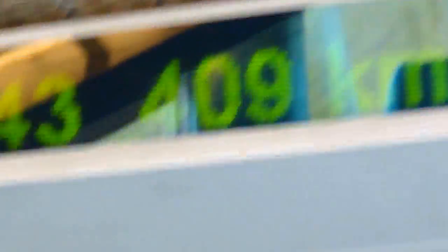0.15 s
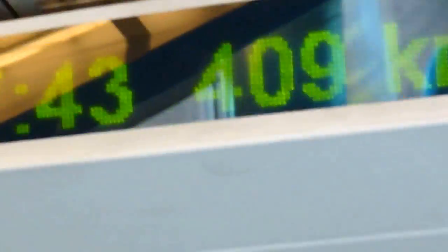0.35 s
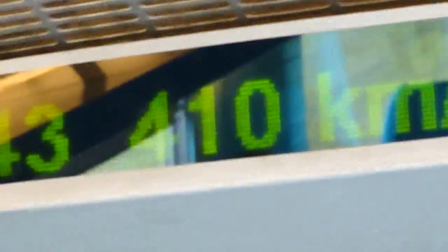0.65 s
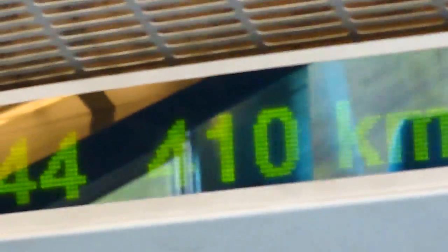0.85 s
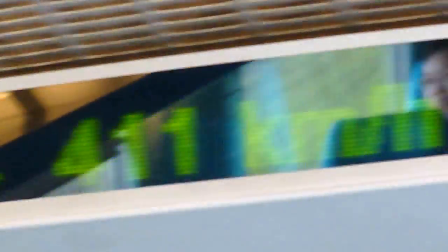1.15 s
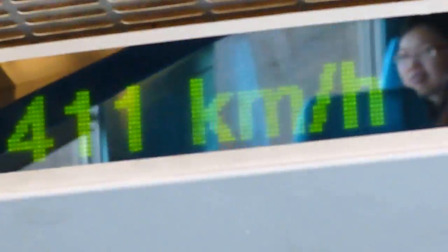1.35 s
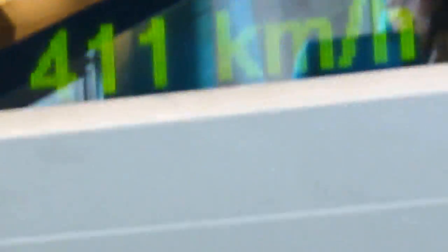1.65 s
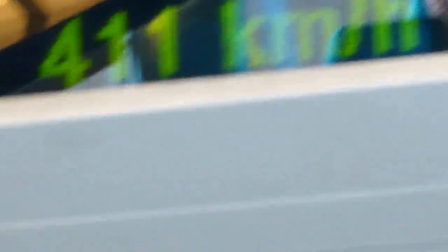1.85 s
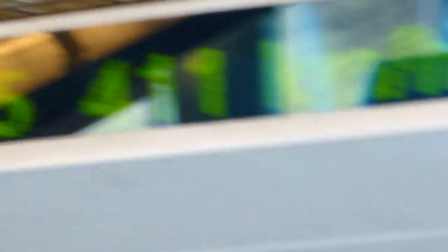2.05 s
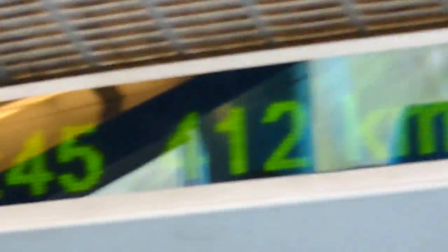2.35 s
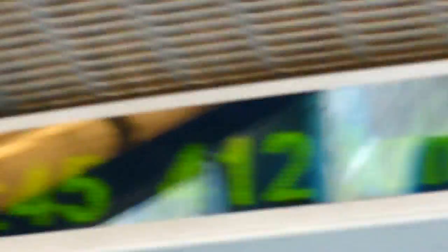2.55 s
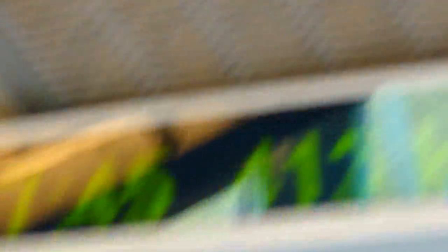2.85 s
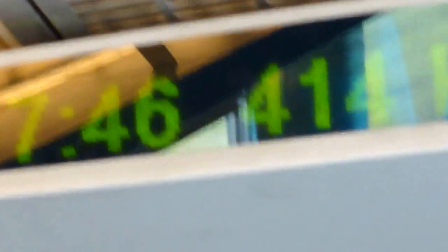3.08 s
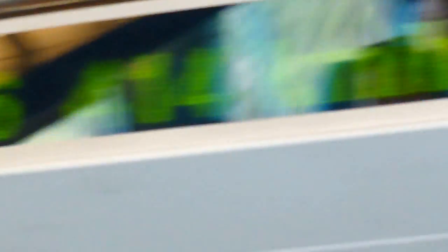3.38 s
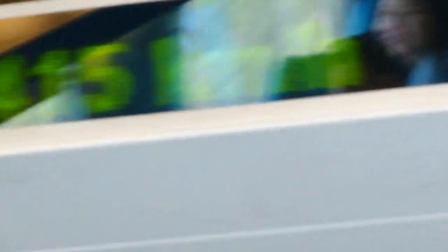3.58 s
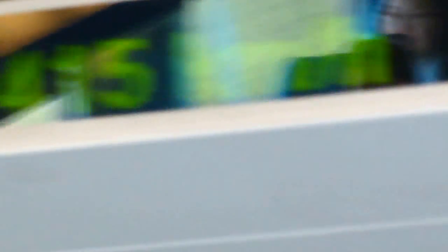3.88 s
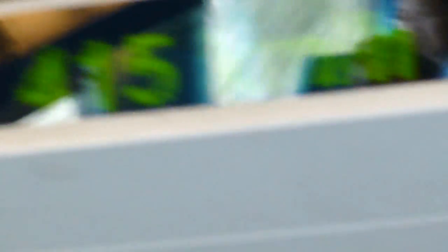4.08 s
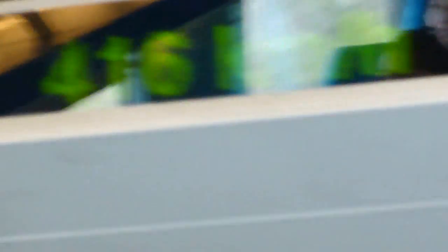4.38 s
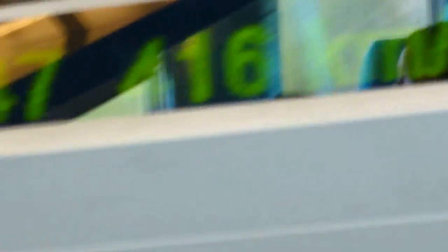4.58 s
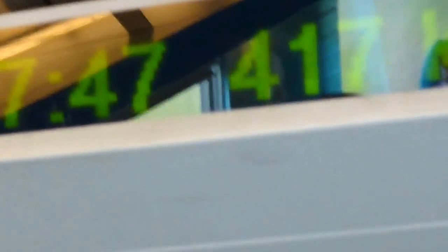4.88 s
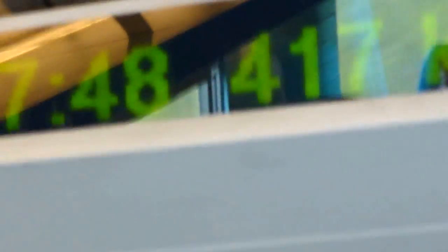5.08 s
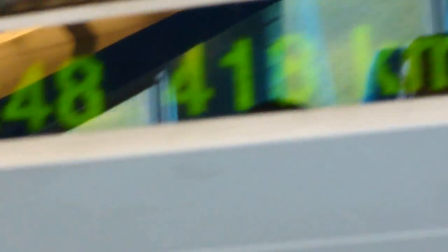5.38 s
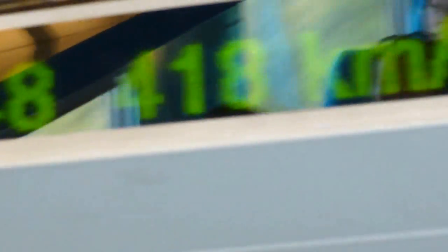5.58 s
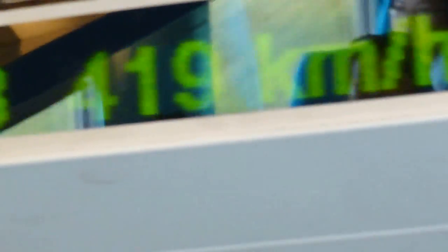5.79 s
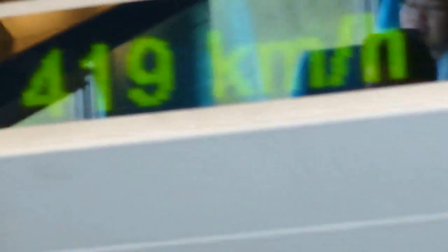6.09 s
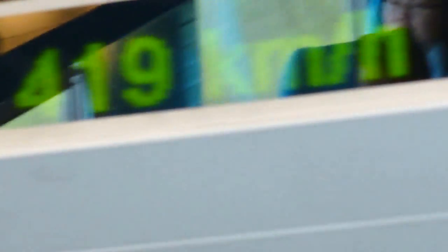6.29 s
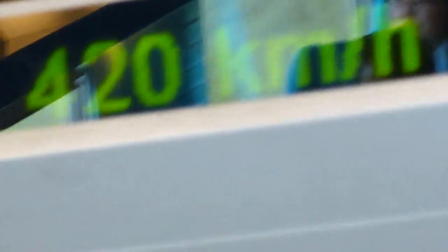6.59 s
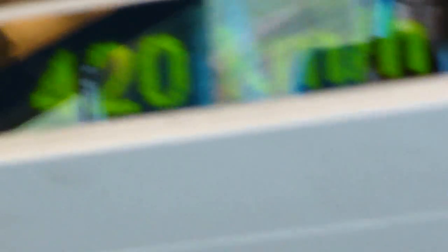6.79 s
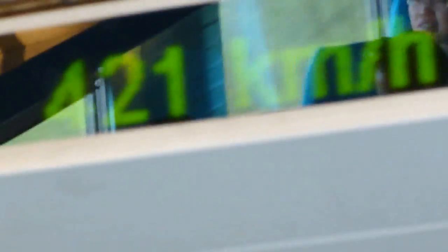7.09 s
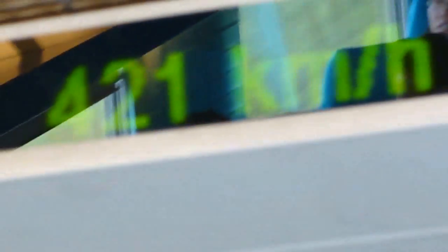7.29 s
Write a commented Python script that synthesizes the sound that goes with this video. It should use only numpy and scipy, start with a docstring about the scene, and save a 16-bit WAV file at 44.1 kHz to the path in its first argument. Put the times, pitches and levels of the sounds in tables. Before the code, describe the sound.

A passenger cabin at high speed: full, low-weighted air noise through the body shell, steady with small uneven gusts. Over it a narrow airy whistle flutters in strength but stays on nearly the same note. Quiet motor tones hum underneath, rising very slightly, with a thin higher tone coming and going. Faint cabin trim rustles and clicks are scattered throughout. Heard from a single microphone inside, already running at the start and unchanged at the end.

```python
"""Inside the cabin of a magnetically levitated train that slowly gains speed.
Air rushes along the body: turbulent noise, coloured by the shell and unsteady in level.
A gap whistles on one wavering pitch: noise in a narrow resonance that saturates.
The track's repeating motor segments hum on multiples of their passing rate, creeping up with speed.
Trim rustles and ticks faintly: clumped grains and dying bursts of resonant noise."""
import sys
import numpy as np
from scipy import signal
from scipy.fft import rfft, irfft
from scipy.io import wavfile
from scipy.ndimage import uniform_filter1d

SR = 44100
rng = np.random.default_rng(int(sys.argv[2]) if len(sys.argv) > 2 else 0)


def dump(signal):
    """Clip the signal to [-1, 1] and save it as 16-bit WAV at the path in sys.argv[1]."""
    limited = np.clip(np.atleast_2d(signal).T, -1, 1)
    pcm = np.round(limited * 32767).astype(np.int16)
    wavfile.write(sys.argv[1], SR, pcm)


N = 328104  # length in samples


def gain_of(db):
    """Level definition: 20 dB is a tenfold amplitude."""
    return 10 ** (np.asarray(db) / 20)


def evened(x):
    """Normalisation: scales a signal to rms 1."""
    return x / np.sqrt(np.mean(x ** 2) + 1e-20)


def smooth_noise(count, size):
    """Moving average: smoothing white noise over size values leaves slow variation, here of rms 1."""
    return evened(uniform_filter1d(rng.standard_normal(count), size=size))


def columns(rows, t):
    """Linear interpolation: joins the rows of a curve table at the times t."""
    s, *values = np.transpose(rows)
    return [np.interp(t, s, v) for v in values]


def over_log_frequency(rows, hz):
    """Logarithmic frequency scale: joins the rows of a spectrum table at the frequencies hz."""
    f, values = np.transpose(rows)
    return np.interp(np.log(hz + 1), np.log(f + 1), values)


def resonance_curve(hz, centre, width):
    """Lorentzian resonance: 1 at the centre, one half at half a width to either side."""
    return 1 / (1 + (2 * (hz - centre) / width) ** 2)


def add(mix, s, sound):
    """Superposition: lays a sound into the mix at s seconds."""
    part = mix[round(s * SR):][:len(sound)]
    part += sound[:len(part)]


def resonate(x, hz, width):
    """Heterodyne: shifts the curve hz to zero, smooths, shifts back, a resonance of gain 1."""
    turn = np.exp(2j * np.pi * np.cumsum(hz * np.ones(len(x))) / SR)
    r = np.exp(-np.pi * width / SR)
    smoothed = signal.lfilter([1 - r], [1, -r], x / turn)
    return 2 * (turn * smoothed).real


def drift(t, per_s):
    """Random-phase superposition: sines up to per_s turns a second, slow ones stronger, to rms 1."""
    rates = np.geomspace(per_s / 10, per_s, num=20)
    phases = rng.random(len(rates))
    return evened(sum(np.sin(2 * np.pi * (f * t + p)) / np.sqrt(f) for f, p in zip(rates, phases)))


# spectrum of the air rush through the body shell: f/Hz, relative level per Hz/dB
RUSH_SPECTRUM = [(20, -43), (50, -12.5), (80, -5.5), (150, -6), (270, -1), (360, -6), (600, -7), (900, -12),
                 (1500, -16), (2300, -22), (3600, -29), (4300, -36), (7000, -46.5), (11000, -56.5)]
# cabin and panel resonances that lift or dip the rush: f/Hz, width/Hz, change/dB
CABIN_RESONANCES = [(170, 39, 3.5), (212, 21, -2), (244, 28, 1), (307, 32, 2.5), (521, 48, 2.5),
                    (1205, 69, 2.5), (1710, 50, -2.5), (671, 14, -1.5), (2770, 290, -1.5), (3820, 300, 0)]
# swelling and sinking of the rush, before each pitch takes its share: t/s, level/dB
RUSH_SWELL = [(0, -22.5), (.55, -25), (.85, -23.5), (1.5, -23), (1.75, -25.5), (2.3, -22.5), (2.7, -24.5),
              (3, -24), (3.6, -23.5), (4.2, -23.5), (4.9, -22.5), (5.5, -23), (5.95, -25), (6.2, -23),
              (7.44, -23)]
# how far each pitch follows the swells, flicker and gusts: f/Hz, share (1 is fully)
FOLLOW_SHARE = [(50, .3), (400, 0.35), (1500, 1.0), (5000, 0.98), (10000, 0.67)]
BOOM_HZ, BOOM_WIDTH, BOOM_DB = 282, 98, 1.07  # a low resonance whose lift wavers about BOOM_DB


def rush(patchy_db=0.42, flicker_db=0.81, gust_db=0.86, lumpy_db=0.8):
    """Filtered turbulence: the shell colours broadband noise; its level varies in time and pitch."""
    hz = np.fft.rfftfreq(N, 1 / SR)
    colour_db = over_log_frequency(RUSH_SPECTRUM, hz)
    for centre, width, change_db in CABIN_RESONANCES:
        colour_db += change_db * resonance_curve(hz, centre, width)
    steady = irfft(rfft(rng.standard_normal(N)) * gain_of(colour_db), N)

    # short-time spectrum, so that time and pitch can be weighted together
    hz, t, spectrum = signal.stft(evened(steady), SR, nperseg=1024, noverlap=768)
    patches = rng.standard_normal((len(hz), len(t)))
    patches = uniform_filter1d(patches, size=14, axis=0)
    patches = evened(uniform_filter1d(patches, size=12, axis=1))
    flicker = smooth_noise(len(t), 5)
    lumps = smooth_noise(len(t), 12)

    swell_db, = columns(RUSH_SWELL, t)
    mean_db = swell_db.mean()
    change_db = swell_db - mean_db + flicker_db * flicker + gust_db * drift(t, 8.)
    share = over_log_frequency(FOLLOW_SHARE, hz)[:, None]
    field_db = mean_db + share * change_db + patchy_db * patches
    boom = resonance_curve(hz[:, None], BOOM_HZ, BOOM_WIDTH)
    field_db += (BOOM_DB + lumpy_db * lumps) * boom
    return signal.istft(spectrum * gain_of(field_db), SR, nperseg=1024, noverlap=768)[1][:N]


# drift of the whistle in pitch and strength: t/s, f/Hz, level/dB
WHISTLE_DRIFT = [(0, 1117, -26.5), (.3, 1130, -33), (.55, 1120, -28), (.95, 1130, -31), (1.5, 1113, -28),
                 (1.85, 1113, -30.5), (2.33, 1132, -29.5), (2.65, 1126, -32.5), (3.1, 1126, -27),
                 (3.6, 1123, -30.5), (3.9, 1116, -27.5), (4.3, 1125, -27.5), (4.85, 1127, -29.5),
                 (5.2, 1123, -29), (5.45, 1131, -36.5), (5.65, 1119, -28), (5.95, 1128, -32.5),
                 (6.25, 1133, -27.5), (6.75, 1122, -29.5), (7.25, 1126, -32), (7.44, 1144, -29.5)]


def whistle(t, width=50, hold=.18):
    """Narrow-band excitation: turbulence in a gap's resonance breaks its tone into quick beads."""
    hz, db = columns(WHISTLE_DRIFT, t)
    blur = rng.standard_normal(N)
    for _ in range(3):
        blur = resonate(blur, hz, width)  # width in Hz of each pass
    # the whistle feeds itself and saturates: weak beads grow, strong ones are held back
    envelope = abs(signal.hilbert(evened(blur)))
    held = blur / (envelope + .1) ** hold
    return gain_of(db) * evened(resonate(held, hz, width))


# speed of the train: t/s, speed/(m/s)
TRAIN_SPEED = [(0, 113.86), (3.72, 115.84), (7.44, 117.47)]
# steady tones of the passing motor segments: multiple of the segment rate, mean rms level/dB
HUM_TONES = [(1, -41), (3, -40.5), (4, -47.5), (6, -46.5)]
# thin tone of the slots, which comes and goes: t/s, rms level/dB
SLOT_LEVEL = [(0, -66), (1.2, -44), (2.3, -45), (3.7, -57), (4.8, -41), (5.7, -50), (6.3, -45), (7.44, -50)]
SEGMENT_M, SLOTS = 1.032, 12  # segment length in m, slots to a segment
HUM_WAVER_DB = 1.5  # rms waver of each hum tone


def motor(t):
    """Periodic excitation: each passing segment is one turn, and tones are multiples of that rate."""
    speed, = columns(TRAIN_SPEED, t)
    turns = np.cumsum(speed / SEGMENT_M) / SR
    slot_db, = columns(SLOT_LEVEL, t)
    tones = gain_of(slot_db) * np.sin(2 * np.pi * SLOTS * turns)
    coarse = t[::441]  # every 10 ms is enough for a slow waver
    for multiple, db in HUM_TONES:
        waver_db = HUM_WAVER_DB * np.interp(t, coarse, drift(coarse, 1.51))
        phase = 2 * np.pi * (round(multiple) * turns + rng.random())
        tones += gain_of(db + waver_db) * np.sin(phase)
    return np.sqrt(2) * tones  # a sine of rms 1 peaks at root 2


# soft rustles of the trim: t/s, length/s, rms level before the fades/dB
TRIM_RUSTLES = [(.33, .12, -61), (1, .06, -59), (1.552, 0.094, -60), (2.19, .16, -62), (2.347, .12, -60),
                (2.838, .063, -58), (3.424, 0.1, -58), (3.958, .055, -59), (4.683, 0.066, -60),
                (5.283, .046, -61), (5.6, .12, -61), (5.85, .05, -62)]
RUSTLE_HZ = 7700


def rustles(clump_db=1.8, rustle_width=3500):
    """Modulated noise: grains of uneven strength, in clumps, excite a broad resonance."""
    out = np.zeros(N)
    for s, length, db in TRIM_RUSTLES:
        count = round(length * SR)
        clumps = gain_of(clump_db * smooth_noise(count, 150))
        grains = rng.standard_normal(count) * clumps
        for _ in range(2):
            grains = resonate(grains, RUSTLE_HZ, rustle_width)
        add(out, s, gain_of(db) * evened(grains) * signal.windows.tukey(count, .5))
    return out


# dry ticks of the trim: t/s, starting rms level/dB, f/Hz, time to fall 60 dB/s, width/Hz
TRIM_TICKS = [(1.003, -54, 8300, .05, 1500), (1.030, -51, 6800, .06, 900), (1.557, -52, 8300, .05, 1500),
              (2.185, -55, 8500, .05, 1500), (2.288, -52, 7450, .09, 450), (2.351, -40, 10000, .009, 3000),
              (2.433, -54, 9000, .015, 3000), (2.452, -51, 7500, .08, 450), (3.465, -55, 7150, .02, 1500),
              (3.484, -35, 6500, .019, 7000), (3.766, -52, 9800, .017, 1500), (3.799, -52, 8500, .03, 1500),
              (3.810, -49, 8000, .02, 3000), (3.996, -49, 7100, .03, 1500), (4.273, -49, 9500, .014, 3000),
              (5.301, -49, 8500, .04, 5000), (6.629, -52, 8200, .035, 1500), (6.988, -53, 8200, .04, 1500)]


def ticks():
    """Exponential decay: each tick is resonant noise whose level falls steadily in dB."""
    out, t = np.zeros(N), np.arange(3000) / SR
    for s, db, hz, t60, width in TRIM_TICKS:
        burst = rng.standard_normal(len(t))
        for _ in range(2):
            burst = resonate(burst, hz, width)
        add(out, s, gain_of(db - 60 * t / t60) * evened(burst))
    return out


def scene():
    """Superposition: the pressures of all sources add at one microphone."""
    t = np.arange(N) / SR
    return (rush() + whistle(t) + motor(t) + rustles() + ticks())[None]


EDGE_HZ = 11005  # upper edge of the band


def record(dry):
    """Band limitation: a steep low-pass removes the treble above EDGE_HZ."""
    low_pass = signal.firwin(4095, EDGE_HZ, window=("kaiser", 9), fs=SR)
    return signal.oaconvolve(dry, low_pass[None], "same")


dry = scene()
out = record(dry)
dump(out)
```